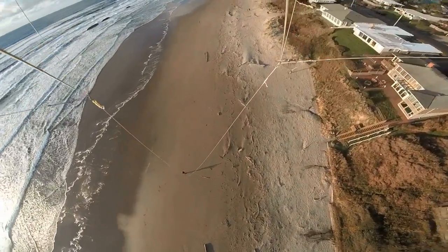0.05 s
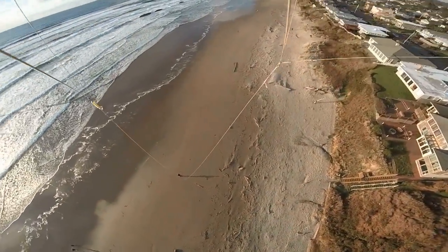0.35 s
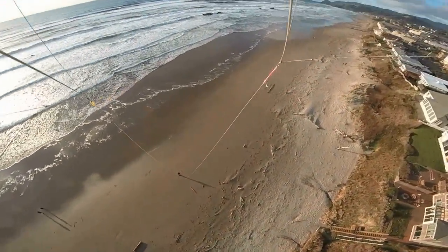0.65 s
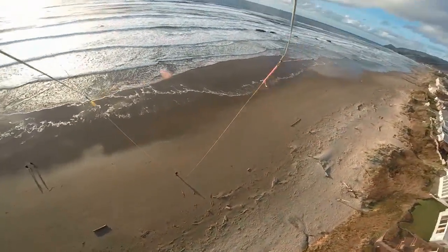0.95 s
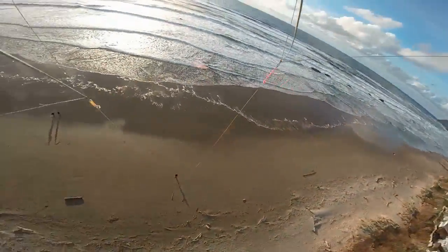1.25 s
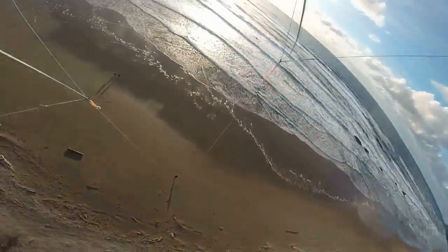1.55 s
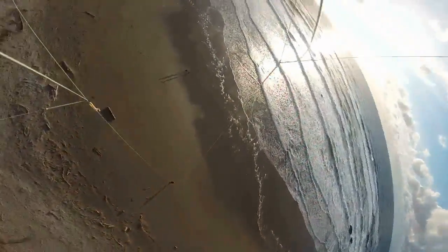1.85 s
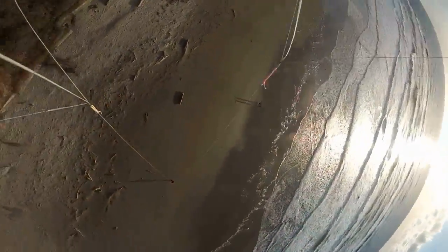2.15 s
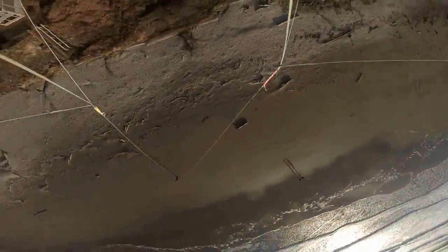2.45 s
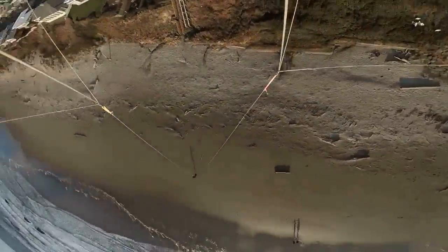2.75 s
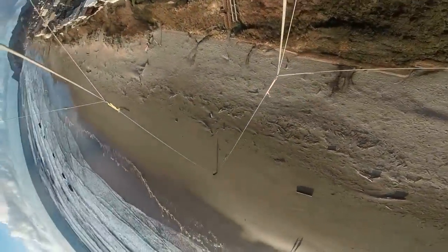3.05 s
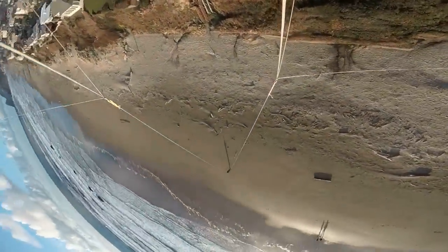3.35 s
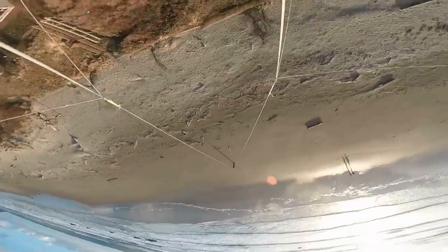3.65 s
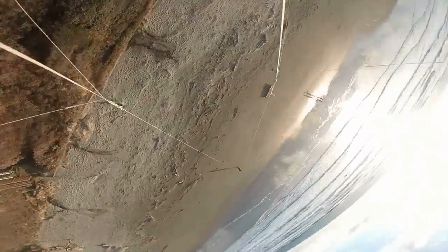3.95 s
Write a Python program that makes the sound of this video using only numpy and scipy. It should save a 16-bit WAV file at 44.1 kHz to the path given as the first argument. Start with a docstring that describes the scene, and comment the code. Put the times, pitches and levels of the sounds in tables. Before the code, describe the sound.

Wind rushes past a kite, heard from on board, softly at first with thin line whistles and one sharp knock. Halfway through it swells to a roar, with cracking sail flaps, a humming line and a low fluttering buzz.

```python
"""On a kite above a beach, a camera's microphone rides in the open wind, close to the sail. At first eddies
rumble on the microphone, the lines whistle as they shed vortices and the rigging ticks; just after one second a
fitting knocks on the mount. From two seconds the kite swings round and gathers speed: waves run off the sail in
cracking flaps and a tight line hums. Last, the trailing edge flutters with a low buzz, and the cloth crackles
inside a loud, turbulent roar."""
import sys
import numpy as np
from scipy import signal
from scipy.fft import rfft, irfft
from scipy.io import wavfile

SR = 44100
rng = np.random.default_rng(int(sys.argv[2]) if len(sys.argv) > 2 else 0)


def master(y):
    """Save y as 16-bit WAV."""
    cut = np.clip(np.atleast_2d(y).T, -1, 1)
    pcm = np.round(cut * 32767)  # scale
    wavfile.write(sys.argv[1], SR, pcm.astype(np.int16))


N = 176400

# beat of the trailing edge: time_s, pitch_hz, level_db
FLUTTER = [(2.6,137.8,-45),(2.66,146.1,-19.5),(2.75,148.1,-15),(2.84,124.6,-39),(3.02,112.6,-26.5),(3.17,108.6,-20.5),(3.35,109,-21.5),(3.5,106.7,-18),(3.61,93.4,-17.5),(3.7,86.3,-12),(3.87,87.44,-11.5),(4,94.8,-15)]
# turbulent roar: time_s, level_db
ROAR = [(1.7,-76),(2.05,-41.5),(2.3,-37),(2.6,-36),(2.75,-31.5),(3,-28),(3.12,-25),(3.42,-27.5),(3.5,-27),(3.7,-27),(3.95,-23)]
# spectrum of the roar: frequency_hz, gain_db
ROAR_COLOUR = [(180, -28), (300, 1), (365, 0), (506, -15), (774, -15), (911, -2.5), (1020, -1.5),
               (1200, -11.5), (1490, 0.5), (1750, -8), (1930, -2.5), (2200, -12.5), (2550, -7.5),
               (2810, -15), (3000, -24.5), (3540, -19), (4450, -32.5), (4830, -32.5), (5320, -41.5),
               (6170, -32.5), (7030, -49), (10400, -51.5), (12200, -75.5), (14900, -79)]
# sail flaps, before the slack or taut gains: peak_s, flap_db, thump_db
FLAPS = [(2.06,-27,-23),(2.0813,-16.5,-12),(2.1554,-12,-10),(2.2223,-13.5,-16),
         (2.2717,-18,-42),(2.3038,-23,-23),(2.3475,-26.5,-44),(2.371,-18,-23),(2.3962,-20.5,-18.5),
         (2.5366,-25,-29),(2.573,-19,-16.5),(2.687,-27,-12),(2.8257,-19.5,-12.5),(2.9968,-12,-15),(3.038,-15.5,-20),
         (3.0783,-10,-5),(3.11,-11,-13),(3.1453,-6,-3),(3.2065,-15.5,-5),(3.2354,-12,-15),
         (3.2653,-13,-3),(3.3287,-15,-6.5),(3.405,-12.5,-31.5),(3.4311,-12,-5.5),
         (3.457,-10.5,-3.5),(3.553,-13,-9.5),(3.6582,-17.5,-13.5),(3.704,-10.5,-9.5),(3.783,-17,-9)]
# tone of the flaps against the roar: frequency_hz, slack_db, taut_db
FLAP_TILT = [(300,1.5,-2.5),(1000,3.5,-2.5),(2020,2.5,2.5),(3600,0.5,9),(8070,1,-0.5)]
# wind on the microphone: time_s, level_db
RUMBLE = [(0,-48),(.45,-41.5),(.92,-32.5),(1.2,-35),(1.8,-33),(2.02,-30),(2.2,-22),(2.56,-23.5),(2.62,-26),(2.73,-20),(2.82,-19),(3.02,-19),(3.25,-18.5),(3.55,-18),(4,-17)]
# spectrum of that wind: frequency_hz, gain_db
RUMBLE_COLOUR = [(20,-30),(43,-3),(70,0),(92,3),(140,-2.5),(260,-12.5),(481,-25),(800,-31),(1040,-68.5)]
# heavy throb of the whole sail: time_s, level_db
THROB = [(2.55,-51),(2.95,-24),(3.1,-18.5),(3.28,-12),(3.38,-13.5),(3.6,-49)]
# crackle of the sailcloth: time_s, level_db
CRACKLE = [(0,-81.5),(.9,-66),(1.4,-71.5),(2,-65.5),(2.6,-65),(2.9,-48),(3.05,-53),(3.16,-33.5),(3.24,-59),(3.3,-39.5),(3.44,-41.5),(3.48,-61),(4,-49)]
# sharp snaps of the cloth: peak_s, level_db
SNAPS = [(0.126,-61),(0.556,-55),(0.6514,-45),(1.0418,-49),(1.1949,-44),(2.196,-42),(2.3898,-37),(2.6858,-37.5),(2.776,-37),(2.8692,-30),
         (2.9056,-31),(3.148,-26),(3.1656,-23.5),(3.1994,-23),(3.2796,-24.5),(3.2954,-21),
         (3.5752,-29),(3.7027,-29.5),(3.968,-18)]
# spectrum of crackle and snaps: frequency_hz, gain_db
CRACKLE_COLOUR = [(1000,-41),(2500,17),(3600,11.5),(4900,1.5),(6200,7.5),(7000,-3.5),(7900,1),(9500,-7.5),(11500,-16),(12800,-22.5),(15000,-43)]
# whistle of the main line: time_s, pitch_hz, level_db
MAIN_LINE = [(0,1174,-81),(.45,1154,-56),(.75,1154,-44.5),(.88,1161,-49),(.96,1120,-41.5),(1.12,1072,-48),(1.35,1062,-52.5),(2,1106,-68.5),(2.8,1075,-39.5),(2.92,1238,-42),(3.02,1221,-36),(3.13,999,-33),(3.25,993,-45.5),(4,952,-50)]
# breathy fuzz around and just above the main whistle: pitch_ratio, width_hz, gain_db
WHISTLE_FUZZ = [(1.03,110,-2.5),(1.171,110,-9.5)]
# whistle of the taut bridle line: time_s, pitch_hz, level_db
TAUT_BRIDLE = [(0,1484,-73),(.64,1480,-55),(.92,1445,-52.5),(1.4,1378,-57.5),(1.95,1575,-59.5)]
# whistle of the thinnest line: time_s, pitch_hz, level_db
THIN_LINE = [(0,2600,-81),(.53,2510,-59),(.8,2410,-53),(1.05,2490,-60),(1.25,2500,-59),(1.7,2510,-65)]
# rig ringing under load: time_s, level_db
RIG = [(2,-71),(2.6,-46.5),(3.1,-39.5),(3.45,-30),(3.7,-51.5),(3.9,-38),(3.97,-20.5),(4,-26.5)]
# low hum of a tight line: time_s, pitch_hz, level_db
HUM = [(2.05,353,-64),(2.22,356.3,-39),(2.5,386.3,-41),(2.72,369.4,-40),(2.95,344.3,-33.5),(3.25,370.3,-38.5),(4,376.7,-43)]
# knock on the mount and its rebound: start_s, level_db
KNOCKS = [(1.1636,-17.5),(1.17,-34)]
# modes of the fitting: pitch_hz, gain_db, t60_s
FITTING_MODES = [(1480,4,0.047),(1610,5,0.012),(2364,-2,0.03),(3630,-3,0.0099),(6180,-6.5,0.0098),(10350,-20.5,0.011)]
# spectrum of its gritty contact: frequency_hz, gain_db
GRIT_COLOUR = [(1000, 9.5), (2300, 9), (6500, -16), (11000, -41)]
# light ticks of the rigging: peak_s, level_db, pitch_hz
TICKS = [(0.526,-42,2400),(.853,-38.5,2500),(.894,-36.5,2100),(1.496,-39.5,2430),(1.543,-45,1950),(1.616,-39.5,2470),(1.908,-44,2180),(1.956,-34.5,1793)]
# smooth airflow: time_s, level_db
RUSH = [(0,-61.5),(.5,-53),(.85,-48),(1.2,-47),(1.75,-47.5),(2.05,-47.5),(4,-39.5)]
# spectrum of the airflow: frequency_hz, gain_db
RUSH_COLOUR = [(290,-30),(540,-13),(610,-19.5),(780,-22.5),(1060,2.5),(1430,-1),
               (1820,-9),(2350,-16),(2750,-12),(3700,-24.5),(6350,-35.5),(14900,-48.5)]

TAUT_FROM_S = 2.45  # later flaps are brighter and mostly thump harder
THUMP_HZ, THUMP_LAG_S, THUMP_WIDTH_S, POP_WIDTH_S = 110, 0.0086, 0.012, 0.0018
GRAINS_PER_S = 3500
TIME_S = np.arange(N) / SR


def amp(db):
    """Decibels to gain."""
    return 10 ** (np.asarray(db) / 20)


def unit(x):
    """Scales to rms 1."""
    return x / np.sqrt(np.mean(x ** 2) + 1e-20)


def curve(table):
    """A table's columns at every sample; the last is a level in dB, silent before the first row."""
    times, *columns, level_db = np.transpose(table)
    tracks = [np.interp(TIME_S, times, column) for column in columns]
    return tracks + [np.interp(TIME_S, times, level_db, left=-140)]


def colour(x, spectrum):
    """Causal filter of unit energy with the given spectrum, falling steeply outside it."""
    points_hz, db = np.transpose(spectrum)
    hz = np.maximum(abs(np.fft.fftfreq(8192, 1 / SR)), 1)
    octaves_out = np.maximum(np.log2(points_hz[0] / hz), 0) + np.maximum(np.log2(hz / points_hz[-1]), 0)
    gain_db = np.maximum(np.interp(np.log(hz), np.log(points_hz), db) - 30 * octaves_out, -100)
    minimum_phase = np.exp(np.conj(signal.hilbert(np.log(amp(gain_db)))))
    taps = np.fft.ifft(minimum_phase).real[:4096]
    return signal.fftconvolve(x, taps / np.linalg.norm(taps))[:N]


def wander(rate_hz):
    """Random drift of rms 1 up to the given rate."""
    hz = np.fft.rfftfreq(N, 1 / SR)
    return unit(irfft(rfft(rng.standard_normal(N)) / (1 + (hz / rate_hz) ** 4), N))


def spike(t, rise_s, fall_s):
    """Swells to 1 at t = 0 and dies away."""
    return np.exp(-np.minimum(np.maximum(-t / rise_s, t / fall_s), 20))


def phase_of(hz):
    """Running phase of a steady or moving pitch."""
    return 2 * np.pi * np.cumsum(hz * np.ones(N)) / SR


def noise_band(hz, width_hz):
    """A band of noise that follows a pitch."""
    phase = phase_of(hz)
    return unit(wander(width_hz / 2) * np.cos(phase) + wander(width_hz / 2) * np.sin(phase))


def edge_flutter():
    """Close by, the trailing edge beats unevenly: a low buzz that also chops the turbulent roar."""
    hz, level_db = curve(FLUTTER)
    phase = phase_of(hz * (1 + 0.0242 * wander(32.4)))
    overtones = sum(amp(db) * np.cos(k * phase) for k, db in [(2, -13), (3, -21), (4, -29)])
    shake = amp(2.2 * wander(40))
    buzz = unit((np.cos(phase) + overtones) * shake) * amp(level_db)
    bursts = amp(1.77 * wander(47) + wander(440))  # flicker and finer grit
    chop = 1 + 0.25 * np.cos(phase)
    air = unit(rng.standard_normal(N) * chop * bursts)
    return buzz + colour(air * amp(curve(ROAR)[0]), ROAR_COLOUR)


def sail_flaps(taut):
    """Each flap swells to a crack as a wave runs off the sail, and shoves air at the microphone."""
    swell_power, cracks, thumps = np.zeros((3, N))
    rise_s, gain_db, thump_gain_db = (0.0033, -8.5, -2.5) if taut else (0.0053, -2.5, 2)
    for peak_s, flap_db, thump_db in FLAPS:
        if (peak_s > TAUT_FROM_S) != taut:
            continue
        span = abs(TIME_S - peak_s) < 0.1
        t = TIME_S[span] - peak_s
        peak_db = flap_db + gain_db
        swell_power[span] += (amp(peak_db) * spike(t, rise_s, fall_s=0.0056)) ** 2
        crack = amp(17.5 + 1.56 * peak_db)  # grows faster than the flap itself
        cracks[round(peak_s * SR)] += crack
        push = np.exp(-((t - THUMP_LAG_S) / THUMP_WIDTH_S) ** 2) * np.cos(2 * np.pi * THUMP_HZ * t)
        spread = (t / POP_WIDTH_S) ** 2
        pop = crack * amp(-8.5) * np.exp(-spread) * (1 - 2 * spread)  # pressure pulse under the crack
        thumps[span] += amp(thump_db + thump_gain_db) * push + pop
    tilt_hz, slack_db, taut_db = np.transpose(FLAP_TILT)
    tilt_db = taut_db if taut else slack_db
    spectrum = [(hz, db + np.interp(np.log(hz), np.log(tilt_hz), tilt_db)) for hz, db in ROAR_COLOUR]
    swells = rng.standard_normal(N) * np.sqrt(swell_power)
    return thumps + colour(cracks + swells, spectrum)


def wind_rumble():
    """Eddies buffet the microphone itself, and the whole sail throbs at the height of the gust."""
    eddies = unit(colour(rng.standard_normal(N), RUMBLE_COLOUR) * amp(1.5 * wander(25)))
    throb = amp(curve(THROB)[0]) * noise_band(hz=70.14, width_hz=15.1)
    return eddies * amp(curve(RUMBLE)[0]) + throb


def cloth_crackle():
    """At close range, stiff sailcloth crackles in clumps of tiny grains, with sharp snaps."""
    size_db = 5.5 * np.minimum(rng.exponential(1, N), 4)
    clump_db = 3 * wander(90)
    signs = rng.choice([-1, 1], N)
    onsets = rng.random(N) < GRAINS_PER_S / SR
    grains = unit(amp(size_db + clump_db) * signs * onsets) * amp(curve(CRACKLE)[0])
    snaps = sum(amp(db) * spike(TIME_S - peak_s, rise_s=0.0011, fall_s=0.0013) for peak_s, db in SNAPS)
    return colour(grains + snaps * rng.standard_normal(N), CRACKLE_COLOUR)


def line_whistles():
    """Vortices shed by the lines make each whistle at its own pitch."""
    main_hz, main_db = curve(MAIN_LINE)
    phase = phase_of(main_hz * (1 + 0.0162 * wander(64)))
    flicker = amp(2.6 * wander(37))
    main = unit(np.sin(phase) * flicker)
    fuzz = sum(amp(db) * noise_band(main_hz * ratio, width_hz) for ratio, width_hz, db in WHISTLE_FUZZ)
    taut_hz, taut_db = curve(TAUT_BRIDLE)
    taut = noise_band(taut_hz, width_hz=50)
    thin_hz, thin_db = curve(THIN_LINE)
    thin = noise_band(thin_hz, width_hz=210)
    twin = amp(-4) * noise_band(hz=2710, width_hz=210)  # a second thin line holds a higher pitch
    return amp(main_db) * (main + fuzz) + amp(taut_db) * taut + amp(thin_db) * (thin + twin)


def rig_ring():
    """The rig rings as the load grows."""
    pitch_hz = 1500 * (1 + 0.017 * wander(9.8))
    return amp(curve(RIG)[0]) * noise_band(pitch_hz, width_hz=85)


def line_hum():
    """A line hums once it is pulled tight."""
    hz, level_db = curve(HUM)
    return amp(level_db) * noise_band(hz, width_hz=35.5)


def mount_knock():
    """Right by the microphone, a small hard fitting strikes the camera mount grittily and rebounds."""
    ring, grit = np.zeros((2, N))
    grit_fall_s = 0.0075
    for start_s, level_db in KNOCKS:
        t = np.clip(TIME_S - start_s, 0, 0.5)
        grit += amp(level_db - 10.5) * (t > 0) * np.exp(-t / grit_fall_s)
        for k, (hz, gain_db, t60_s) in enumerate(FITTING_MODES):
            decay = np.exp(-np.log(1000) * t / t60_s)
            ring += (-1) ** k * amp(level_db + gain_db) * decay * np.sin(2 * np.pi * hz * t)
    return ring + colour(grit * rng.standard_normal(N), GRIT_COLOUR)


def rigging_ticks():
    """The rigging ticks lightly while the kite still glides."""
    ticks = np.zeros(N)
    for peak_s, level_db, hz in TICKS:
        envelope = spike(TIME_S - peak_s, rise_s=0.00069, fall_s=0.0038)
        ticks += amp(level_db) * envelope * noise_band(hz, width_hz=1600)
    return ticks


def air_rush():
    """Smooth airflow over the kite, a soft bed behind the rest."""
    return colour(rng.standard_normal(N) * amp(curve(RUSH)[0]), RUSH_COLOUR)


def scene():
    """Everything in mono, from the microphone on the kite."""
    sail = edge_flutter() + sail_flaps(taut=False) + sail_flaps(taut=True)
    cloth = cloth_crackle() + rigging_ticks()
    wind = wind_rumble() + air_rush()
    rigging = line_whistles() + rig_ring() + line_hum() + mount_knock()
    return (sail + cloth + wind + rigging)[None]


def record(dry):
    """The camera's microphone overloads softly; the ends are eased and the band stops at 15 kHz."""
    limited = dry / (1 + (dry / 0.85) ** 6) ** (1 / 6)
    fades = np.minimum(np.minimum(TIME_S, TIME_S[::-1]) / 0.002, 1)
    lowpass = signal.firwin(511, 15000, window=("kaiser", 9), fs=SR)
    return signal.oaconvolve(limited * fades, lowpass[None], "same")


dry = scene()
out = record(dry)
master(out)
```